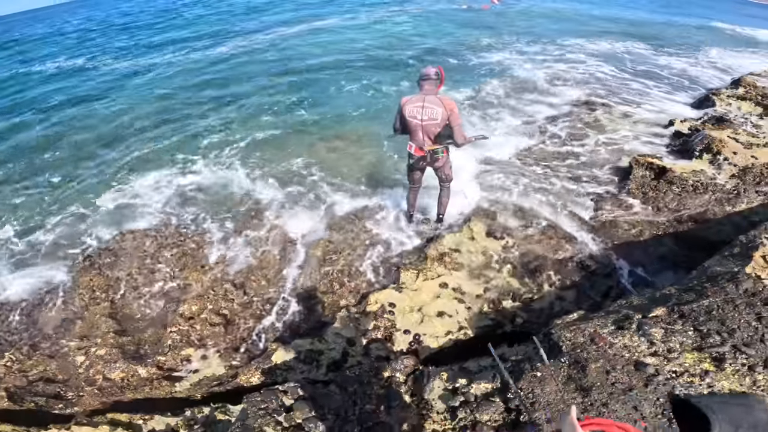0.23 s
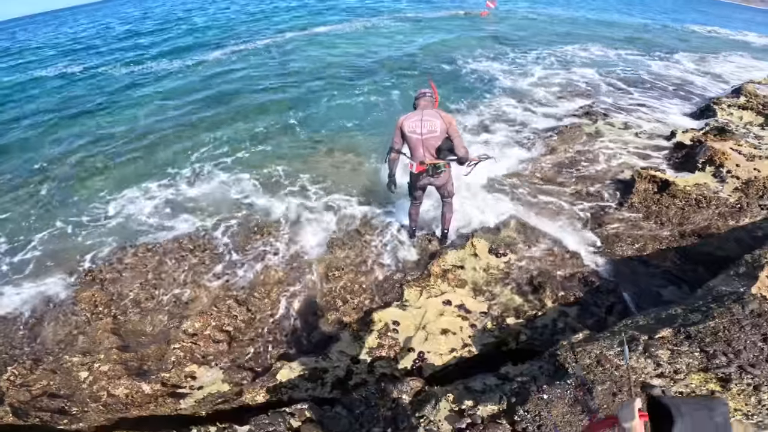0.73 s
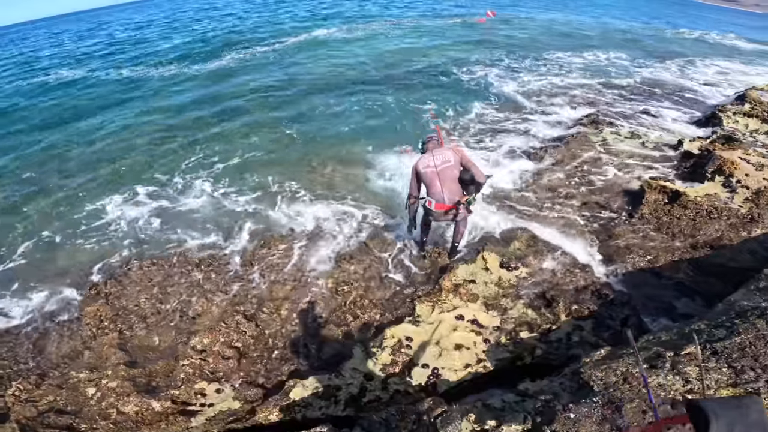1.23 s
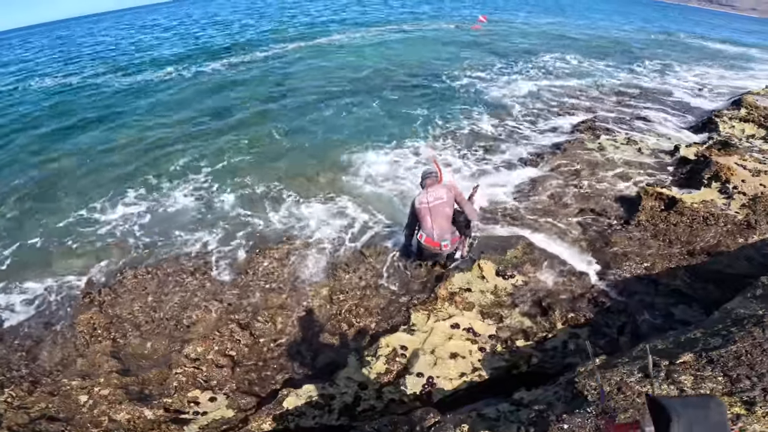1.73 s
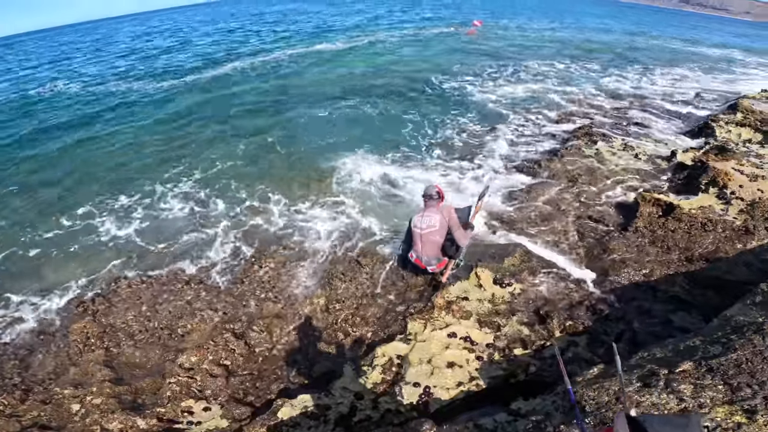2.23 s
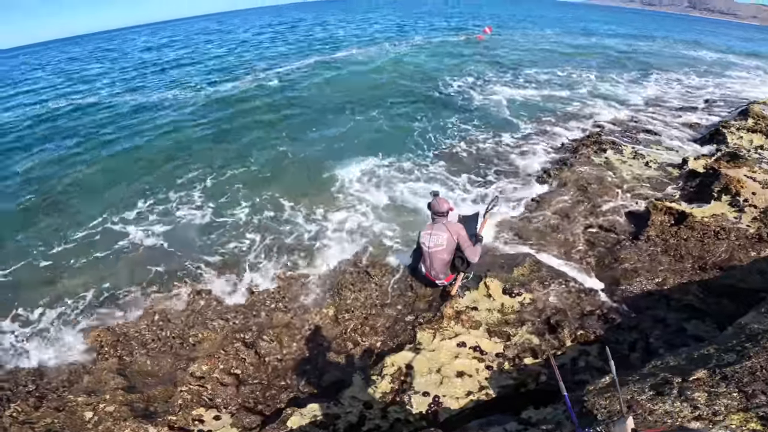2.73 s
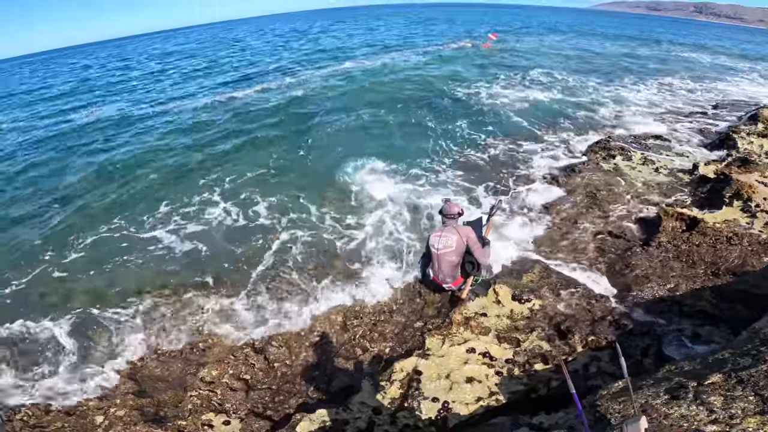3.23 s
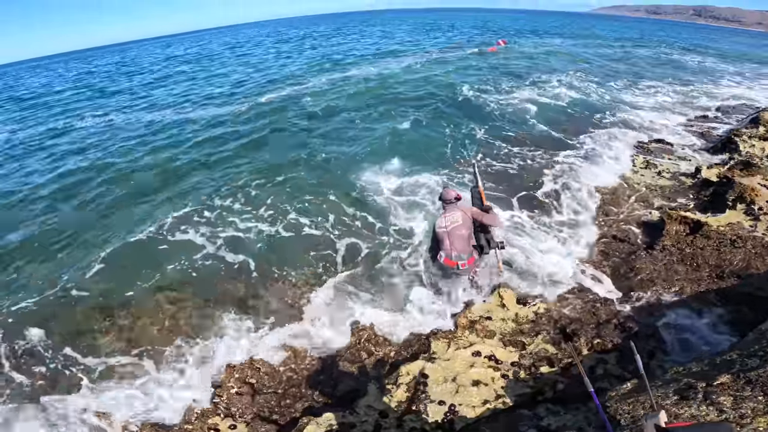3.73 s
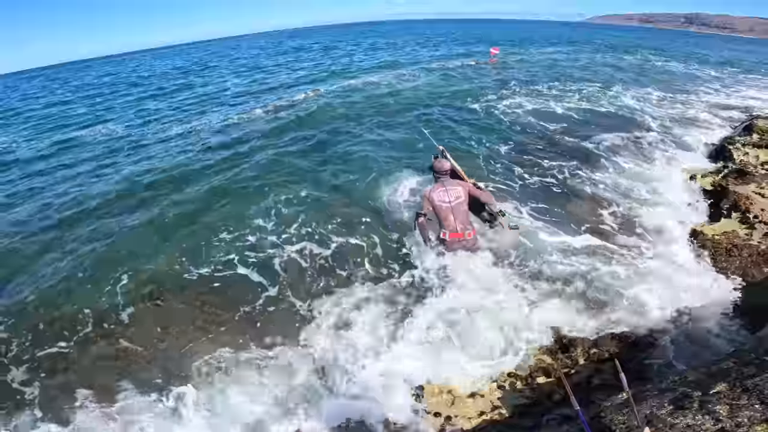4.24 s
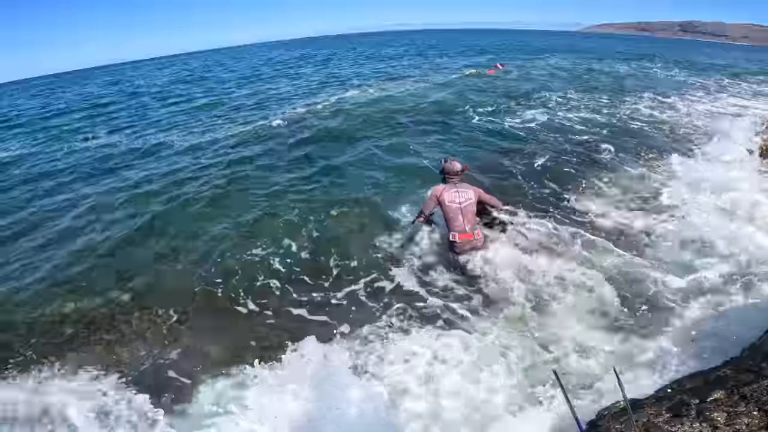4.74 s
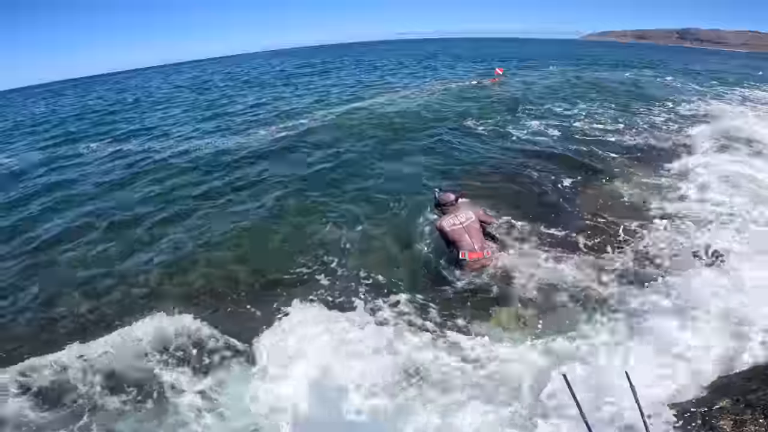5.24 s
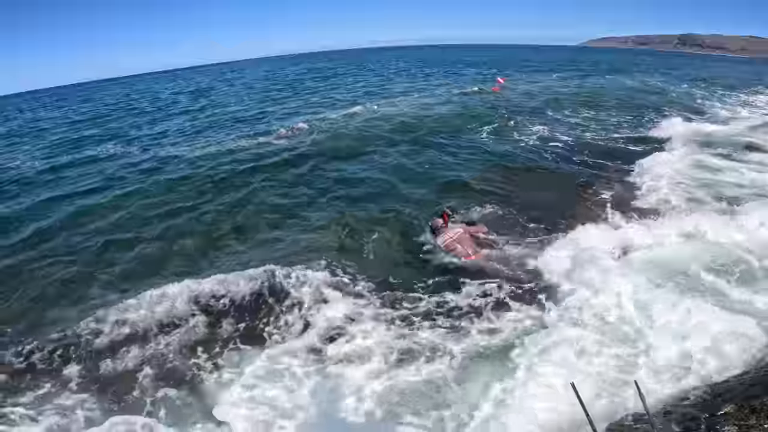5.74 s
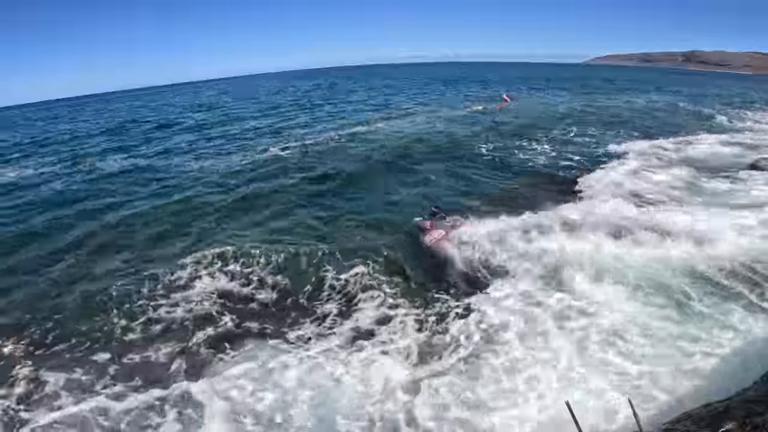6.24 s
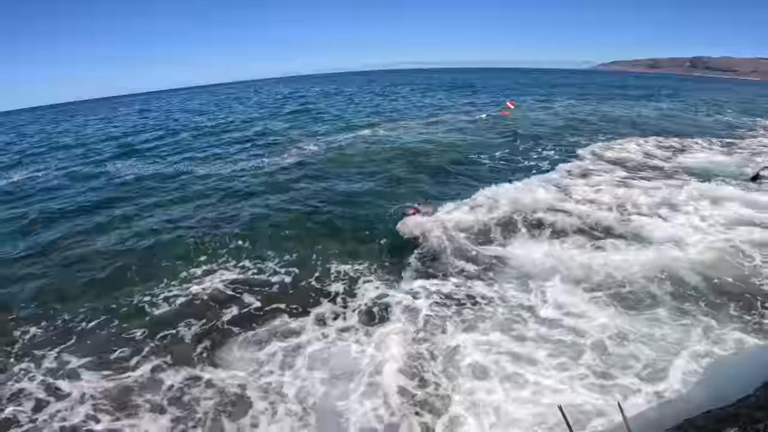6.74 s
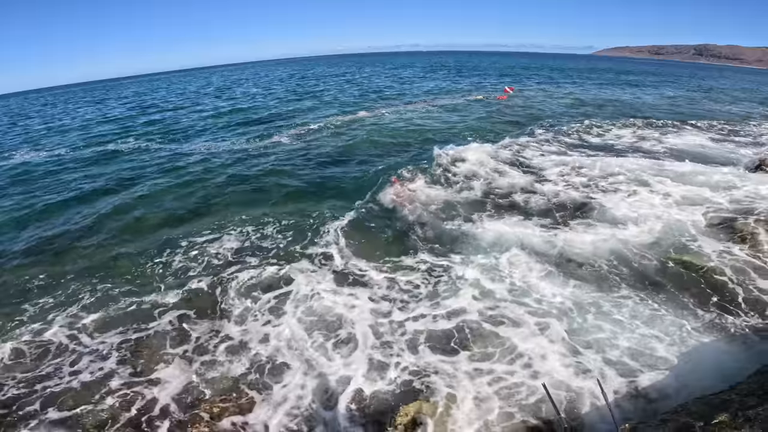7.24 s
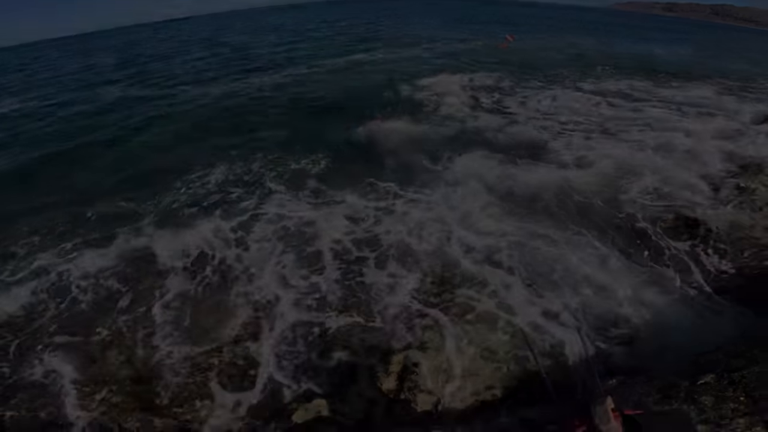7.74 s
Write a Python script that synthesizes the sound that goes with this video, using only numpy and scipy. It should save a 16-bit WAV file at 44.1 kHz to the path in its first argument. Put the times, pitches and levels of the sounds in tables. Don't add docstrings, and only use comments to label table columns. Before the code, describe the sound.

Wind thumps low on a camera in a sealed housing beside the sea. Foam hisses softly at first, with a resonant trickle draining through stones, then swells into a full, bubbling crash of surf. The wash thins out, one air pocket gulps, and the hiss rises again near the end. Soft knocks come and go, finishing with tugs and a quick loose rattle. Distant swell murmurs faintly underneath.

```python
import sys
import numpy as np
from scipy import signal
from scipy.fft import rfft, irfft, next_fast_len
from scipy.io import wavfile
from scipy.ndimage import uniform_filter1d

SR = 44100
rng = np.random.default_rng(int(sys.argv[2]) if len(sys.argv) > 2 else 0)


def persist_wave(psi):
    counts = np.round(np.clip(psi, -1, 1) * 32767).astype(np.int16)
    wavfile.write(sys.argv[1], SR, np.atleast_2d(counts).T)


def level_to_linear(level):
    exponent = np.asarray(level, float) / 20
    return 10 ** exponent


N = 352639

# pitch_hz, level_db (per Hz)
FOAM_SPECTRUM = [(90, -15), (160, -2.5), (350, -6), (700, -9), (1500, 1), (3000, -9.5), (5000, -7),
                 (7000, -14.5), (8500, -22), (10500, -70), (13000, -31.5), (15500, -56)]
# time_s, tipped_down (0-1), turned_along_shore (0-1)
CAMERA_POSE = [(0, 1., 0.3), (.3, 0.78, 0.2), (.7, 0.66, 0.), (1.2, 0.56, 0.2), (2, 0.4, 0.3),
               (2.8, 0.07, 0.6), (3.6, 0.02, 0.63), (5.5, 0.1, 0.2), (6.4, 0.26, 0.24), (7, 0.03, 0.4),
               (7.6, 0, 1), (8, 0.2, 0.3)]


def rms_one(x):
    return x / np.sqrt(np.mean(x ** 2) + 1e-20)


def in_time(rows):
    s, *columns = np.transpose(rows)
    return [np.interp(np.arange(N) / SR, s, column) for column in columns]


def at_hz(points, hz):
    point_hz, point_db = np.transpose(points)
    return np.interp(np.log(hz), np.log(point_hz), point_db)


def drift(rate_hz):
    r = np.exp(-2 * np.pi * rate_hz * 40 / SR)
    noise = rng.standard_normal(N // 40 + 2002)
    slow = signal.lfilter([1], [1, -2 * r, r * r], noise)[2000:]
    return np.interp(np.arange(N) / 40, np.arange(len(slow)), rms_one(slow))


def bell(s, half_s):
    out = np.zeros(N)
    first = max(round((s - 5 * half_s) * SR), 0)
    last = min(round((s + 5 * half_s) * SR), N)
    near = np.arange(first, last)
    out[near] = np.exp(-.5 * ((near / SR - s) / half_s) ** 2)
    return out


def band(x, low_hz, high_hz):
    return signal.sosfilt(signal.butter(2, [low_hz, high_hz], "band", fs=SR, output="sos"), x)


def low_pass(x, hz):
    return signal.sosfilt(signal.butter(4, hz, fs=SR, output="sos"), x)


def colour(x, shapes):
    sections = []
    for hz, width_hz, db in shapes:
        a, c, g = np.pi * width_hz / SR, -2 * np.cos(2 * np.pi * hz / SR), level_to_linear(db / 2)
        section = np.array([1 + a * g, c, 1 - a * g, 1 + a / g, c, 1 - a / g])
        sections.append(section / (1 + a / g))
    return signal.sosfilt(sections, x)


def add(out, s, sound):
    at = round(s * SR)
    out[at:at + len(sound)] += sound[:N - at]


def wobble(db, hz, swell_s):
    t = np.arange(SR // 4) / SR
    envelope = t / swell_s * np.exp(1 - t / swell_s)
    return level_to_linear(db) * envelope * np.sin(2 * np.pi * hz * t)


def wash():
    # time_s, hiss_db
    wash_level = [(0, -51.5), (.7, -52), (1.9, -51.5), (2.45, -49.5), (3.35, -46), (3.62, -39.5),
                  (3.95, -39), (4.1, -35.5), (4.8, -37), (5.3, -40), (5.66, -40), (5.75, -43.5),
                  (6.1, -44.5), (6.8, -47.5), (7.75, -42.5), (8, -46.5)]
    # time_s, hiss_rise_db, length_s, heavy_water_db, spray_db
    splashes = [(.02, 1, 0.24, 9, 2), (2.527, 3, .03, -1, .3), (2.726, 2.5, 0.055, 0, -3),
                (3.17, 3.5, 0.064, 1, -4), (3.62, 0.3, 0.076, -2.5, 3), (4.1, -1.1, 0.056, -1.5, 5),
                (4.446, 2.5, 0.028, -1, -1.5), (4.704, 3, 0.045, -1.5, 1), (4.973, .5, 0.15, 2, 2),
                (5.39, 0.1, 0.16, -3, 3.5), (5.842, .5, 0.18, 0.5, -0.5), (6.25, 1, 0.14, 0.5, 3),
                (7.767, -1, 0.047, 1, 2), (7.99, 1.5, 0.016, 3, -4)]
    spray_lag_s = 0.34
    swell_db, = in_time(wash_level)
    earlier_db = np.interp(np.arange(N) - spray_lag_s * SR, np.arange(N), swell_db)
    rise_db, heavy_db, fine_db = np.zeros((3, N))
    for s, hiss, length_s, heavy, fine in splashes:
        bump = bell(s, length_s)
        rise_db += hiss * bump
        heavy_db += heavy * bump
        fine_db += fine * bump
    surge_db = 0.23 * (swell_db - swell_db.mean()) + heavy_db
    spray_db = -1.5 + 0.29 * (earlier_db - swell_db) + fine_db
    return swell_db + rise_db, surge_db, spray_db


def bursts(per_s, spread_db):
    size_db = spread_db * np.minimum(rng.exponential(1, (2, N)), 5)
    clicks = level_to_linear(size_db) * rng.choice([-1, 1], (2, N))
    return rms_one(clicks * (rng.random((2, N)) < per_s / SR))


def bubbles(per_s, cycles):
    size_db = 4.04 * np.minimum(rng.exponential(1, N), 3.5)
    sizes = level_to_linear(size_db) * (rng.random(N) < per_s / SR) + 1e-18
    dealt, out = rng.integers(0, 40, N), 0
    for k, hz in enumerate(np.geomspace(450, 9500, 40)):
        r, w = level_to_linear(-60 * hz / (cycles * SR)), 2 * np.pi * hz / SR
        struck = sizes * (dealt == k) + 1e-18
        rung = signal.lfilter([0, np.sin(w)], [1, -2 * r * np.cos(w), r * r], struck)
        out = out + level_to_linear(at_hz(FOAM_SPECTRUM, hz)) * hz / 4000 * rung
    return out


def ports(direct, diffuse):
    # pitch_hz, quarter_cycle_share
    lead = [(350, 0.035), (750, 0.25), (1150, 0.17), (1600, 0.18), (2300, 0.38), (3000, 0.15), (3900, 0.18),
            (4300, 0.016), (6000, 0.0083)]
    # pitch_hz, width_hz, left_minus_right_db
    port_gap = [(700, 166, -9), (1190, 140, -4.5), (1610, 240, 13), (3300, 810, 10), (3500, 420, 0),
                (4270, 580, -3.5), (5650, 1200, -2.5)]
    # pitch_hz, width_hz, level_db
    difference = [(546, 100, 10.5), (870, 150, 2.5), (1010, 150, 10), (1370, 290, -14.5), (1600, 150, -9),
                  (2050, 210, -9), (2070, 85, 13), (2830, 410, 7.5)]
    # pitch_hz, width_hz, level_db
    housing = [(546, 180, -6), (750, 230, 0), (1017, 123, -5.5), (1330, 230, 5), (1455, 85, -2.5),
               (1870, 68, 0.5), (1956, 460, 7), (3050, 980, 3), (3810, 140, 0.5), (4450, 280, 2.5),
               (4750, 320, 5), (5440, 150, 2.5), (5580, 310, -6.5), (5980, 210, 1.5), (6610, 300, 2),
               (7064, 320, 5), (7300, 150, -3.5), (7900, 180, 3), (11940, 1010, -7.5), (13900, 1100, -13)]
    # pitch_hz, width_hz, level_db
    tipped_colour = [(2314, 490, 10.5), (2940, 700, 4), (3360, 160, -9), (3550, 240, 3), (4260, 250, 4),
                     (4440, 340, -6), (5360, 200, 2), (5770, 130, 2), (6100, 460, -7.5), (6800, 400, -5),
                     (4050, 120, 0), (4900, 120, -1)]
    # pitch_hz, width_hz, level_db
    turned_colour = [(3800, 340, -5.5), (5900, 300, 3.5), (6870, 580, 6)]
    size = next_fast_len(N)
    hz = np.fft.rfftfreq(size, 1 / SR) + 1
    ahead = irfft(1j * rfft(direct, size) * at_hz(lead, hz), size)[:N]
    left = colour(direct, [(2027, 443, -25)] + [(hz, w, db / 2) for hz, w, db in port_gap])
    right = colour(direct, [(2446, 313, -23)] + [(hz, w, -db / 2) for hz, w, db in port_gap])
    apart = colour(diffuse[1] - ahead, difference)
    level = colour(np.array([left + apart, right - apart]) + diffuse[0], housing)
    tipped, turned = in_time(CAMERA_POSE)
    tipping = tipped * (colour(level, tipped_colour) - level)
    turning = turned * (colour(level, turned_colour) - level)
    return level + tipping + turning


def surf():
    # pitch_hz, level_db (re foam)
    diffuse_spectrum = [(100, -19), (400, -18.5), (800, -11.5), (1600, -14.5), (2600, -17), (3800, -5.5),
                        (4700, -38), (6500, -29), (11000, -33), (13000, -2.5)]
    # time_s, cleft_share (0-1)
    drain = [(0, 0.56), (.1, 1.), (.3, 0.7), (.65, 0.63), (.9, .1), (1.5, 0.054), (8, .01)]
    # pitch_hz, width_hz, level_db
    cleft = (2990, 170, 10)
    hiss_db, surge_db, spray_db = wash()
    pops, around = bursts(per_s=14000, spread_db=2.5), rng.standard_normal((2, 2, N))
    splash_db = 0.13 * drift(26) + 0.48 * drift(42)
    low_patch, high_patch = drift(8.9), drift(1.2)
    direct, diffuse = 0, 0
    edges = 90 * 2 ** np.arange(0, 7.6, 1 / 3)
    for k, (low, high) in enumerate(zip(edges, edges[1:])):
        hz = np.sqrt(low * high)
        big = np.interp(hz, [900, 1150], [1, 0])
        fine = np.interp(hz, [4000, 11000], [0, 1.2])
        height = np.interp(np.log(hz), np.log([500, 8000]), [0, 1])
        patch_db = 0.18 * ((1 - height) * low_patch + height * high_patch) + 0.99 * drift(9.6)
        water_db = big * surge_db + fine * spray_db
        gain = level_to_linear(at_hz(FOAM_SPECTRUM, hz) + water_db + splash_db + patch_db)
        direct = direct + gain * band(pops[k % 2], low, high)
        diffuse = diffuse + gain * level_to_linear(at_hz(diffuse_spectrum, hz)) * band(around[k % 2], low, high)
    direct = direct + level_to_linear(-18.5) * bubbles(per_s=1500, cycles=100)
    direct = direct + in_time(drain)[0] * (colour(direct, [cleft]) - direct)
    return level_to_linear(hiss_db) * rms_one(ports(direct, diffuse))


def far_swell():
    return level_to_linear(-62.5 + 2 * drift(5.8)) * rms_one(band(rng.standard_normal(N), 146, 318))


def eddies(low_hz, high_hz, evenness):
    run_in = band(rng.standard_normal(N + SR), low_hz, high_hz)
    envelope = np.abs(signal.hilbert(run_in, next_fast_len(N + SR))[:N + SR])
    swell = uniform_filter1d(envelope, size=900)
    return rms_one((run_in / (swell / swell.mean() + 0.12) ** evenness)[SR:])


def wind():
    # time_s, rumble_db
    pressure = [(0, -37.5), (.6, -40.5), (1, -38), (2.3, -33), (2.8, -37.5), (3.5, -38), (4.3, -45.5),
                (5.2, -44.5), (5.95, -47), (6.4, -30), (7.1, -34.5), (8, -30.5)]
    # time_s, peak_db, pitch_hz
    buffets = [(0.317, -12.5, 26), (0.426, -34, 27.8), (0.784, -31.5, 23.5), (0.858, -21.5, 22),
               (1.048, -25.5, 25.8), (1.166, -27.5, 27.7), (1.46, -26, 28.6), (1.624, -25, 21.7),
               (2.023, -24.5, 23.5), (2.259, -22, 28.8), (2.376, -26.5, 24.5), (2.447, -23.5, 28.2),
               (2.538, -29.5, 21), (2.867, -33, 24.5), (3.316, -25.5, 26.7), (3.488, -27.5, 20.9),
               (3.885, -32.5, 28.8), (4.332, -37, 27), (4.639, -41, 26.2), (4.763, -31.5, 24.5),
               (5.676, -34.5, 22.2), (6.544, -23, 31), (6.61, -22.5, 36.5), (6.913, -25, 32.8),
               (7.09, -27.5, 27.2), (7.365, -21, 32), (7.566, -22, 27.7), (7.77, -22, 26.3)]
    # time_s, rise_db
    puffs = [(.12, -8), (.34, 2), (.98, 6), (1.24, 0), (1.46, 6), (1.62, 8), (1.97, 14), (2.07, 4),
             (2.23, 3), (2.45, -3), (3.01, 2.5), (3.42, 6.5), (3.72, 3), (4.02, 9), (4.64, 11), (4.74, 7),
             (4.83, 8.5), (5.13, 4.5), (5.7, -6), (5.98, 8.5), (6.34, -1), (6.55, -1), (6.75, 5),
             (7.13, -4), (7.24, 8.5), (7.43, -1)]
    rumble_db, = in_time(pressure)
    t, swings, clear, stir_db = np.arange(N) / SR, np.zeros(N), 1, 0
    for s, db, hz in buffets:
        bump = bell(s, 0.48 / hz)
        swings += level_to_linear(db) * bump * np.sin(2 * np.pi * hz * (t - s))
        clear = clear * (1 - bump)
        stir_db = stir_db + 4 * bump
    steady = level_to_linear(rumble_db + 1.5 * drift(6.5)) * clear * eddies(17.3, 44, evenness=0.29)
    rumble = low_pass(steady, 49.4) + swings
    flutter_db = -51.5 + 0.48 * (rumble_db - rumble_db.mean()) + stir_db
    flutter_db = flutter_db + sum(db * bell(s, 0.03) for s, db in puffs)
    flutter = low_pass(level_to_linear(flutter_db) * eddies(44.2, 83.7, evenness=0.6), 219)
    own = level_to_linear(rumble_db - 48) * rms_one(band(rng.standard_normal((2, N)), 22, 55))
    pan_db = -2 + 1.6 * in_time(CAMERA_POSE)[0]
    return (rumble + flutter) * level_to_linear(np.outer([.5, -.5], pan_db)) + low_pass(own, 72)


def knocks():
    # time_s, ring_db, ring_hz, swell_s, contact_db
    blows = [
        (0.625, -26.5, 68, 0.015, -29.5),
        (1.715, -31, 60.3, 0.0093, -34),
        (1.91, -31, 76, 0.0061, -25),
        (2.66, -37, 83, 0.019, -47),
        (3.294, -30.5, 66.5, 0.018, -36),
        (6.892, -37, 68, 0.013, -48),
        (7.552, -32, 61, 0.0086, -52),
    ]
    # time_s, ring_db, ring_hz, swell_s, contact_db
    tugs = [
        (7.68, -36, 74, 0.0058, -22.5),
        (7.771, -28, 70.5, 0.0059, -37),
    ]
    # time_s, level_db, pitch_hz, swell_s
    rattles = [
        (3.223, -46, 189, 0.0029),
        (7.815, -45, 302, 0.0034),
        (7.848, -40, 318, 0.0022),
        (7.855, -37, 310, 0.0023),
        (7.865, -33, 345, 0.0021),
        (7.911, -30, 303, 0.0023),
        (7.953, -40, 330, 0.0028),
        (1.91, -48, 616, .001),
        (7.681, -39, 480, .0012),
        (7.912, -38, 790, 0.0012),
    ]
    contact_s = 0.0063
    out = np.zeros(N)
    push = np.sin(np.pi * np.arange(round(contact_s * SR)) / (contact_s * SR)) ** 2.37
    for way, rows in ((-1.26, blows), (0.8, tugs)):
        for s, ring_db, hz, swell_s, contact_db in rows:
            add(out, s, way * level_to_linear(contact_db) * push)
            add(out, s, way * wobble(ring_db, hz, swell_s))
    for s, db, hz, swell_s in rattles:
        add(out, s, wobble(db, hz, swell_s))
    return out * level_to_linear([[-.5], [.5]])


def gulps():
    # time_s, level_db, pitch_hz, swell_s
    pockets = [
        (6.2, -56, 700, 0.0076),
        (6.235, -45, 850, 0.0041),
        (6.25, -49, 720, 0.0037),
        (7.74, -45, 1730, .008),
        (7.76, -44, 1670, 0.0068),
    ]
    out = np.zeros(N)
    for s, db, hz, swell_s in pockets:
        add(out, s, wobble(db, hz, swell_s))
    return out


def scene():
    return surf() + far_swell() + wind() + knocks() + gulps()


def roll_off(x):
    return signal.sosfilt(signal.butter(12, 15610, fs=SR, output="sos"), x)


def record(dry):
    mix = low_pass(dry, 13400)
    return roll_off(mix)


dry = scene()
out = record(dry)
persist_wave(out)
```